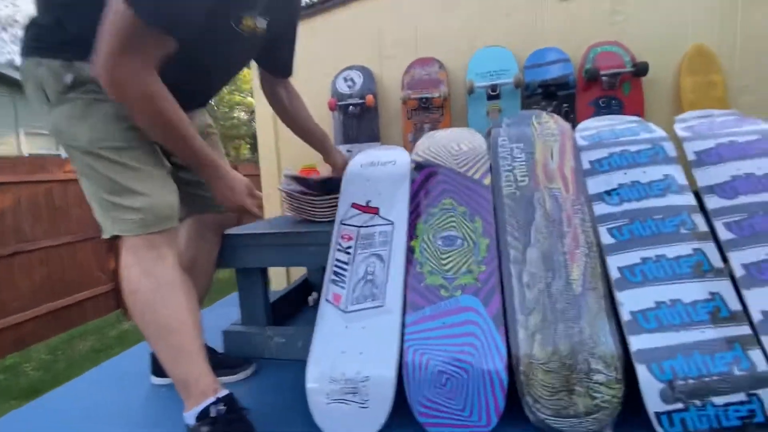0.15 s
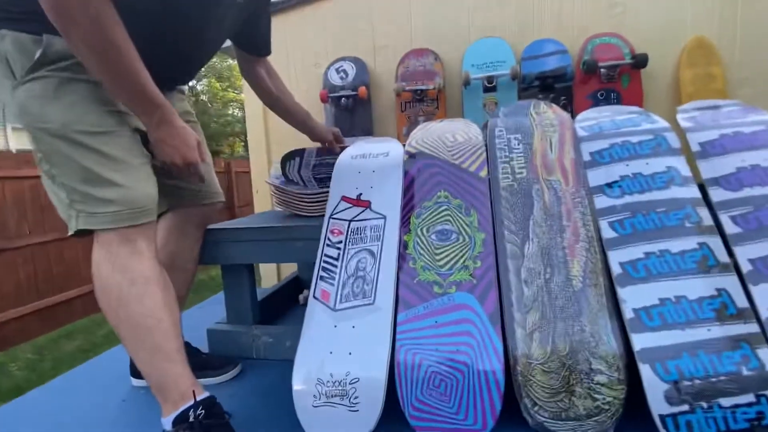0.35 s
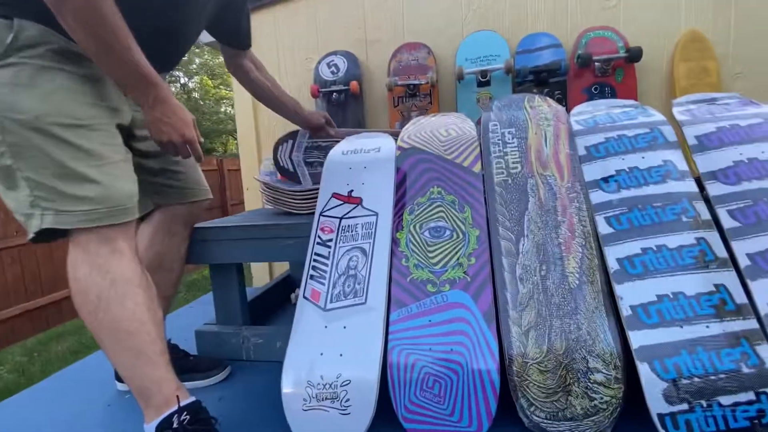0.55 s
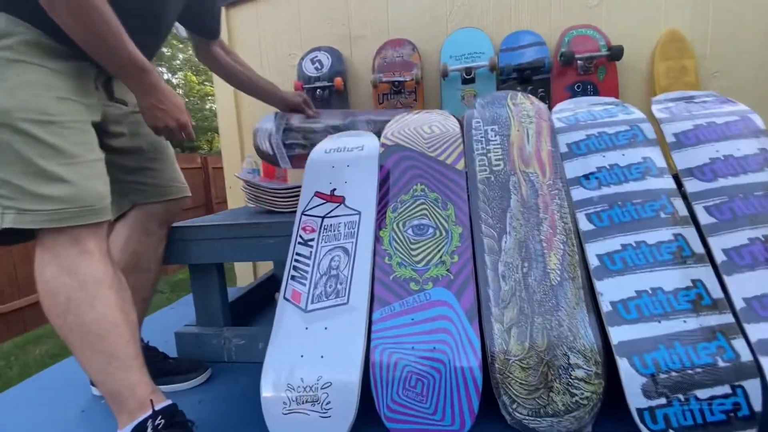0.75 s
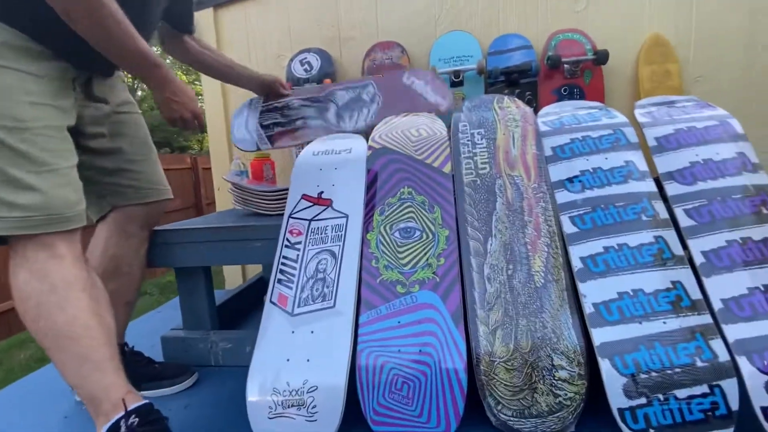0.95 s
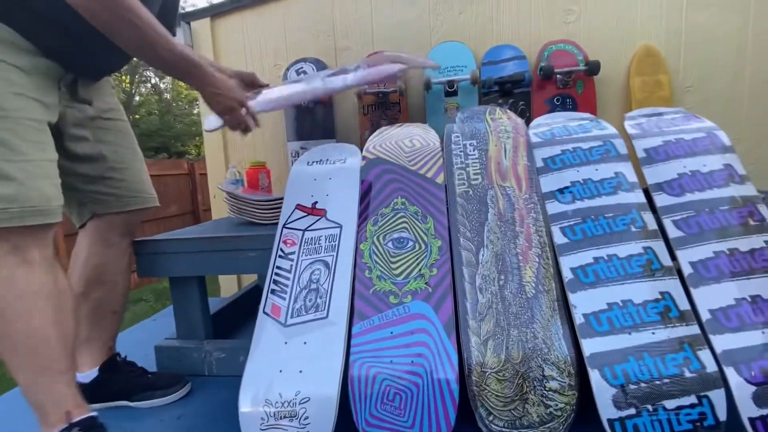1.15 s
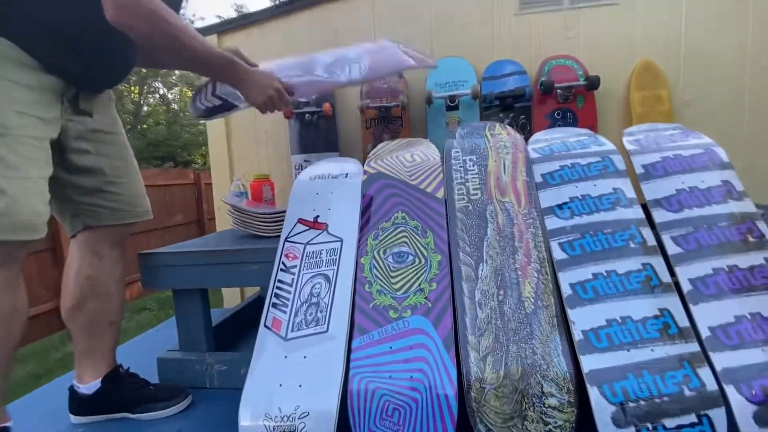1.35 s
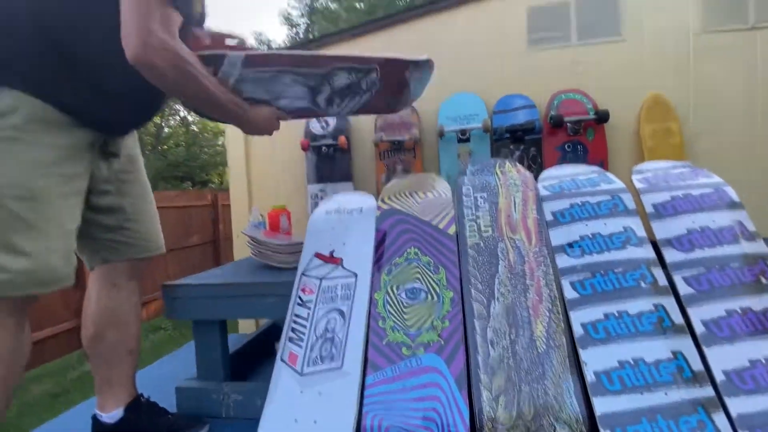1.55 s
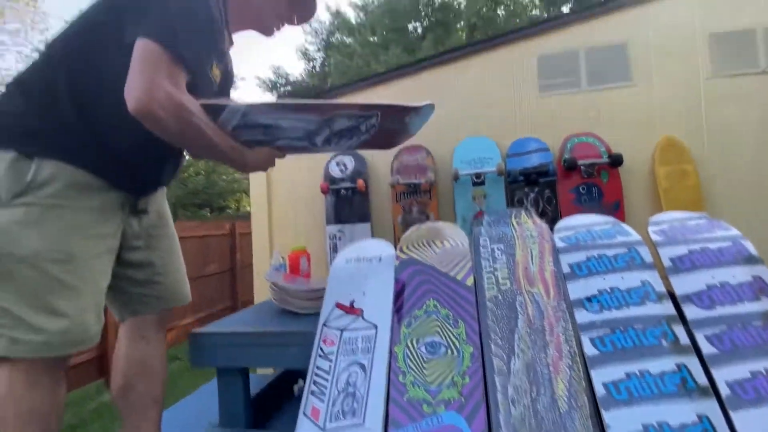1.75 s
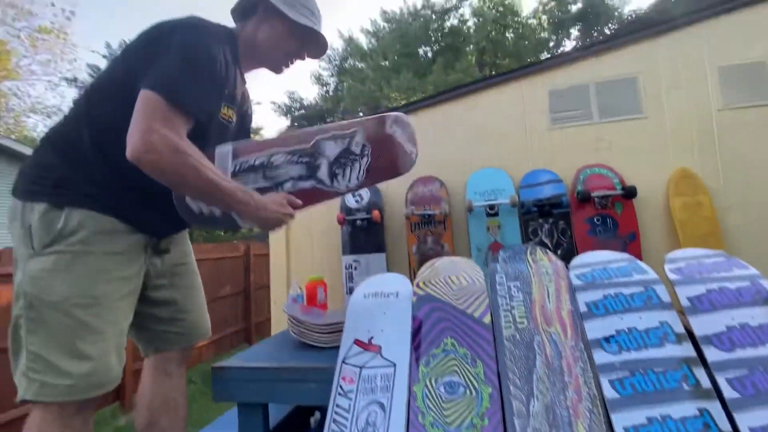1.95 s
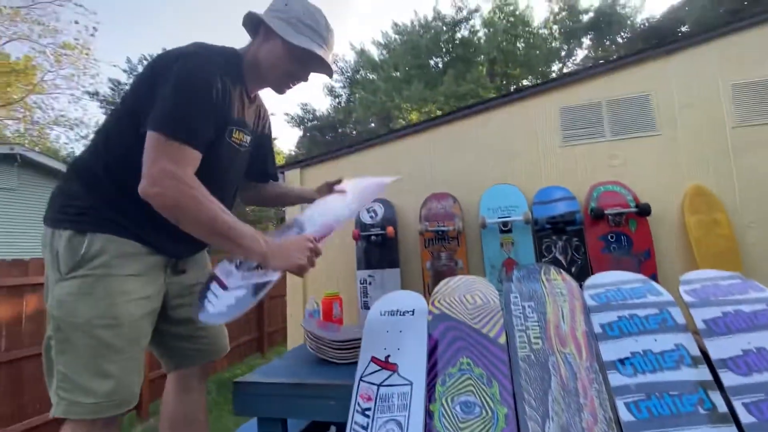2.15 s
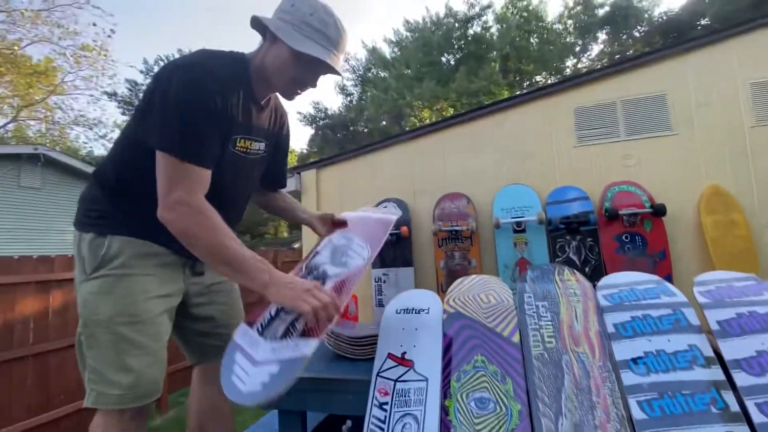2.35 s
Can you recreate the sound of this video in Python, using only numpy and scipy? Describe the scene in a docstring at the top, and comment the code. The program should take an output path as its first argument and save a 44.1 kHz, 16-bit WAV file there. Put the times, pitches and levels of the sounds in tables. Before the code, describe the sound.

Loose wooden board rattles hollowly against stacked boards, then light rubs and taps as birds chirp.

```python
"""A low outdoor rumble and a dry swish of wood come first, then creaks as a wooden skateboard deck is gripped.
The deck is tipped on a stack that lies on a garden bench: it knocks, drops back and rattles as ringing modes
and noise cracks. It is then slid off and turned over in the hands, with noise swishes and light ringing taps.
Small birds call across the yard in gliding tones and noise-modulated buzzes; a wall and a fence answer all
the near sounds with decaying noise echoes. Two microphones with different treble hear the scene."""
import sys
import numpy as np
from scipy import signal
from scipy.fft import rfft, irfft
from scipy.io import wavfile

SR = 44100
rng = np.random.default_rng(int(sys.argv[2]) if len(sys.argv) > 2 else 0)


def store_pcm(level_fs):
    """Save levels as 16-bit WAV."""
    pcm = np.round(np.clip(level_fs, -1, 1) * 32767).astype(np.int16)
    wavfile.write(sys.argv[1], SR, np.atleast_2d(pcm).T)


N = 105840  # samples in the scene

# bending modes of the loose deck: pitch_hz [Hz], level_db [dB], t60_s [s]
DECK_MODES = [(236.8, -4.5, 0.12), (290.7, 2, 0.084), (563, -10.5, 0.14), (880, -30.5, 0.019)]
# modes of the stack of decks: pitch_hz [Hz], level_db [dB]
STACK_MODES = [(238, 5), (404, -10), (499, 0.5), (620, 4.5), (819, -1), (885, -1.5), (935, -4), (968, -0.5),
               (1061, -5), (1189, 0.5), (1470, -7), (1780, -4), (2190, -16), (2400, -6.5), (3080, -9),
               (3700, -10)]

DECK_SIDE, WIDE_HZ = 0.7, 346  # stereo side weight of the wood; pitch of half the full left-right phase shift
WOOD_T60_SLOPE = 0.52  # how steeply ring time shortens with pitch
HELD_T60_S = 0.043  # ring time at 1 kHz of wood damped by the hands


def undb(db):
    """Decibels to gain."""
    return 10 ** (np.asarray(db) / 20)


def unit(x):
    """Scale to rms 1."""
    return x / np.sqrt(np.mean(x ** 2))


def colour(x, points):
    """Filter by a curve of (Hz, dB) points, joined along log frequency."""
    hz, db = np.array(points, float).T
    f = np.maximum(np.fft.rfftfreq(2 * N, 1 / SR), 1)
    gain = undb(np.interp(np.log(f), np.log(hz), db))
    return irfft(rfft(x, 2 * N) * gain)[..., :x.shape[-1]]


def filt(x, hz, kind, order=2):
    """Butterworth filter."""
    edges = np.clip(hz, 10, SR / 2 - 1000)
    return signal.sosfilt(signal.butter(order, edges, kind, fs=SR, output="sos"), x)


def noise(side):
    """Stereo noise with a given side weight."""
    m, s = rng.standard_normal((2, N))
    return (m + side * np.array([s, -s])) / np.sqrt(1 + side ** 2)


def walk(rate):
    """Smooth random wander with rms 1, low-passed at rate in Hz."""
    settled = filt(rng.standard_normal(N + SR), rate, "low")[SR:]
    return unit(settled)


def fade(t60):
    """Exponential decay from time zero, down 60 dB after t60 seconds."""
    return np.exp(-np.log(1000) * np.arange(N) / SR / t60)


def swell(start, length, attack, release):
    """Rounded attack, hold and release; each slope takes at most half the length."""
    t = np.arange(N) / SR - start
    rise = np.clip(t / min(attack, length / 2), 0, 1)
    fall = np.clip((length - t) / min(release, length / 2), 0, 1)
    return np.sin(np.pi / 2 * rise) * np.sin(np.pi / 2 * fall)


def ring(modes):
    """Struck response of a table of modes; higher modes reach the two microphones out of step."""
    t, out = np.arange(N) / SR, 0
    for k, (hz, db, t60) in enumerate(modes):
        sign = (-1) ** k
        spread = np.arctan(DECK_SIDE) * hz ** 2 / (hz ** 2 + WIDE_HZ ** 2)
        lag = sign * spread * np.array([[1], [-1]])
        out = out + sign * undb(db) * np.sin(2 * np.pi * hz * t + lag) * fade(t60)
    return out * (1 - fade(0.012))  # soft onset


def wood_ring(modes, t60):
    """Struck response of wooden modes that last t60 at 1 kHz; higher ones die sooner."""
    return ring([(hz, db, t60 * (1000 / hz) ** WOOD_T60_SLOPE) for hz, db in modes])


def add(out, s, x):
    """Mix x into out from time s."""
    i = int(max(s, 0) * SR)
    out[:, i:] += x[..., :N - i]


def background():
    """Low rumble nearly alike on both sides, wide steady hiss and a distant machine hum that wavers in level."""
    # outdoor air colour: freq_hz [Hz], density_db [dB per Hz]
    air_curve = [(20, -32), (45, -7), (70, 1.5), (95, -8), (120, -3), (170, -13.5), (290, -22),
                 (1000, -34.5), (2500, -40), (5600, -39.5), (7500, -49.5), (15000, -58.5)]
    # distant machine hum: pitch_hz [Hz], level_db [dB]
    hum_tones = [(70, -58.5), (118.4, -58.5), (295.5, -65.5)]
    air_db, wide_hz = -49.5, 510  # air level; the air widens above wide_hz
    t = np.arange(N) / SR
    mid, side = colour(rng.standard_normal((2, N)), air_curve)
    side = 0.087 * side + filt(side, wide_hz, "high", order=1)
    out = undb(air_db) * unit(mid + np.array([side, -side]))
    for hz, db in hum_tones:
        level = undb(db + 2 * walk(3.5)) * np.sqrt(2)
        out = out + level * np.sin(2 * np.pi * (hz * t + rng.random()))
    return out


def rubs():
    """Sliding wood and hands: fine uneven friction hisses while tiny catches of wood on wood ring the board."""
    # swishes: start_s [s], length_s [s], level_db [dB], treble_db above the knee [dB], scrape_db [dB]
    swishes = [(0.009, 0.33, -67.5, 12, 9), (0.083, 0.24, -57.5, -25, -2), (0.944, 0.17, -47.5, 1.5, 0.5),
               (1.251, 0.065, -60, 3, -13), (1.309, 0.17, -51, 3, 2.5), (1.554, 0.15, -62.5, 3, -22),
               (1.613, 0.027, -64, 15.5, -22), (1.798, 0.15, -47, -2.5, -30),
               (1.945, 0.053, -50.5, -0.5, -22), (2.025, 0.28, -60.5, 2, -22),
               (2.27, 0.16, -57.5, -10, -27)]
    # friction colour: freq_hz [Hz], density_db [dB per Hz]
    friction_curve = [(300, -2.5), (620, -1), (1000, 0.5), (2400, -1.5), (4000, -3), (6500, -7.5),
                      (9500, -9.5), (13000, -14), (15500, -35)]
    attack_s, release_s, knee_hz = 0.077, 0.062, 6900
    side, grain_db = 0.89, 1.5  # stereo side weight; spread of the quick unevenness
    board_t60_s, board_share = 0.065, 0.82  # short ringing of the rubbed board
    catches_per_s, catch_spread_db = 900, 3.5

    unevenness = undb(grain_db * walk(410) + 2.15 * walk(30))
    grain = colour(noise(side), friction_curve) * unevenness
    board = unit(rng.standard_normal((1, N)) * fade(board_t60_s)) / np.sqrt(N)
    grain = unit(grain + board_share * signal.fftconvolve(grain, board, axes=1)[:, :N])
    low = filt(grain, knee_hz, "low", order=3)
    high = filt(grain, knee_hz, "high", order=3)

    catches = (rng.random(N) < catches_per_s / SR) * undb(catch_spread_db * rng.exponential(size=N))
    catches = catches * rng.choice([-1, 1], N)
    wood = ring(DECK_MODES) + wood_ring(STACK_MODES, HELD_T60_S)
    scrape = unit(signal.fftconvolve(catches[None], wood, axes=1)[:, :N])

    out = np.zeros((2, N))
    for s, length, db, treble_db, scrape_db in swishes:
        stroke = undb(db) * swell(s, length, attack_s, release_s) ** 1.12
        out += stroke * (low + undb(treble_db) * high + undb(scrape_db) * scrape)
    return out


def creaks():
    """The gripped deck creaks: short resonances roughened by a fast random wander in level."""
    # creaks: start_s [s], level_db [dB]
    grips = [(.112, -43.5), (.125, -42.5), (0.138, -41)]
    # creak resonances: pitch_hz [Hz], level_db [dB], t60_s [s]
    resonances = [(797, -0.5, 0.07), (1340, 3, 0.046), (1484, -1.5, 0.061), (3570, -5, 0.02)]
    out = np.zeros((2, N))
    for s, db in grips:
        add(out, s, undb(db) * ring(resonances) * (1 + .5 * walk(230)))
    return out


def knocks():
    """Each blow bends the deck, rattles the stack (duller when the contact is soft) and shakes the bench below."""
    # blows: start_s [s], flex_db of the deck [dB], clatter_db of the stack [dB],
    # brightness_hz of the contact [Hz], thump_db of the bench [dB]
    blows = [(0.227, -42, -24, 4450, -64), (0.232, -19, -33.5, 900, -61), (0.285, -30, -29.5, 910, -64),
             (0.304, -27.5, -24, 410, -52.5), (0.336, -21.5, -10, 1620, -22.5),
             (.346, -23.5, -15.5, 1290, -12), (.353, -34, -14.5, 1480, -28), (.360, -24, -16.5, 1070, -42),
             (.371, -42, -18.5, 1500, -62), (0.391, -37.5, -20, 2500, -61), (0.4144, -48, -16, 2500, -63),
             (0.421, -21.5, -21.5, 1400, -20.5), (.453, -36, -35.5, 1500, -43),
             (.520, -32, -50, 900, -35.5), (0.563, -23.5, -33, 895, -31), (0.593, -48, -39, 500, -29.5)]
    # bench modes: pitch_hz [Hz], level_db [dB], t60_s [s]
    bench_modes = [(79, 5.5, 0.092), (109.3, -2, 0.27), (134.2, -5.5, 0.2), (177, -7.5, 0.12)]
    # dense crack of the plywood: freq_hz [Hz], density_db [dB per Hz]
    crack_curve = [(150, 5), (400, 9.5), (1100, 2), (2300, -10.5), (3500, -19), (6000, -22), (14000, -31)]
    # faint long ring that outlasts the knocks: pitch_hz [Hz], level_db [dB]
    after_modes = [(1140, -48), (1650, -35)]
    crack_db, crack_t60_s = -0.5, 0.078
    ring_db, stack_t60_s, after_t60_s = -10.5, 0.084, 1  # stack ring time is at 1 kHz

    out, deck, bench = np.zeros((2, N)), ring(DECK_MODES), ring(bench_modes)
    stack = undb(ring_db) * wood_ring(STACK_MODES, stack_t60_s)
    stack = stack + ring([(hz, db, after_t60_s) for hz, db in after_modes])
    crack = undb(crack_db) * unit(colour(noise(DECK_SIDE), crack_curve))
    for s, flex_db, clatter_db, brightness_hz, thump_db in blows:
        fresh_crack = np.roll(crack, rng.integers(N // 2), axis=1)  # another stretch of noise each time
        wood = stack + fresh_crack * fade(crack_t60_s)
        clatter = undb(clatter_db) * filt(wood, brightness_hz, "low", order=1)
        add(out, s, undb(flex_db) * deck + clatter + undb(thump_db) * bench)
    return filt(out, 52, "high", order=4)


def birds():
    """Gliding whistles and thin buzzes (tones times slow noise) that rise and fall, a little to the right."""
    # whistles: start_s [s], length_s [s], start_hz [Hz], end_hz [Hz], level_db [dB]
    whistles = [(0.276, 0.07, 3080, 3030, -58.5), (0.414, 0.078, 2940, 2846, -57.5),
                (0.881, 0.086, 2620, 2460, -67.5), (1.55, 0.045, 2903, 2800, -58.5),
                (1.601, 0.067, 2596, 2530, -62.5), (2.185, 0.082, 3240, 3150, -64),
                (2.281, 0.12, 2730, 2950, -60)]
    # buzzy calls: start_s [s], length_s [s], pitch_hz at both ends [Hz], level_db [dB]
    buzzes = [(0.458, 0.02, 5380, -52), (0.494, 0.033, 5210, -56.5), (0.52, 0.23, 5400, -67.5),
              (0.527, 0.13, 7580, -66), (0.82, 0.17, 5280, -66), (1.10, 0.24, 5370, -62.5),
              (1.651, 0.16, 5240, -61), (2.268, 0.24, 5300, -60.5)]
    wobble_share, arch_share = 0.00676, 0.038  # whistle wobble and mid-buzz rise, as shares of the pitch
    buzz_width_hz, pan_db = 360, -3.5  # pan is left minus right
    t, out = np.arange(N) / SR, np.zeros((2, N))
    wobble, flutter = 1 + wobble_share * walk(180), undb(2 * walk(39.7))
    for s, length, start_hz, end_hz, db in whistles:
        pitch = np.interp(t, [s, s + length], [start_hz, end_hz]) * wobble
        level = undb(db) * swell(s, length, 0.0196, 0.0048) * flutter
        out += level * np.sin(2 * np.pi * np.cumsum(pitch) / SR)
    rasp = unit(filt(noise(.8), buzz_width_hz / 2, "low", order=3))
    for s, length, hz, db in buzzes:
        pitch = hz * (1 + arch_share * swell(s, length, length, length))
        level = undb(db) * swell(s, length, 0.018, 0.083) * rasp
        out += level * np.sin(2 * np.pi * np.cumsum(pitch) / SR)
    return out * undb(np.array([[pan_db], [-pan_db]]) / 2)


def taps():
    """Light taps of hands and ticks of the edge: a noise scuff and the held deck's modes in a band, plus deck flex."""
    # contacts: start_s [s], level_db [dB], centre_hz [Hz]
    contacts = [(1.083, -36, 10600), (1.33, -49, 2500), (1.5035, -28.5, 2420), (1.583, -40, 1920),
                (1.856, -34.5, 900), (2.111, -37, 1580), (2.267, -41, 5350)]
    # modes of the deck held in the hands: pitch_hz [Hz], level_db [dB]
    held_modes = [(825, 1), (1020, -2.5), (1352, 1.5), (1510, -9), (1780, 0.5), (1960, 1.5), (3058, -1),
                  (3680, -2)]
    scuff_t60_s, scuff_db, held_db, flex_db = 0.035, -7.5, -7, -16
    width = 0.53  # half width of the band, as a share of its centre
    out, held = np.zeros((2, N)), wood_ring(held_modes, HELD_T60_S)
    deck = undb(flex_db) * ring(DECK_MODES)
    for s, db, hz in contacts:
        band = [hz / (1 + width), hz * (1 + width)]
        scuff = undb(scuff_db) * unit(filt(noise(0.57), band, "band")) * fade(scuff_t60_s)
        add(out, s, undb(db) * (scuff + undb(held_db) * filt(held, band, "band") + deck))
    return out


def yard(x):
    """Scattered echoes from wall and fence as decaying noise; the lows last slightly longer."""
    echo_db, delay_s, low_t60_s, high_t60_s = -17.5, .012, 0.4, 0.39
    lows = filt(noise(0.1), 373, "low") * fade(low_t60_s)
    highs = filt(noise(0.4), 500, "high") * fade(high_t60_s)
    echo = np.zeros((2, N))
    add(echo, delay_s, filt(lows + highs, 4850, "low", order=1))
    echo = unit(echo) / np.sqrt(N)
    return x + undb(echo_db) * signal.fftconvolve(x, echo, axes=1)[:, :N]


def scene():
    """The handled deck and the birds, with echoes from the yard, over the background."""
    return background() + yard(rubs() + creaks() + knocks() + birds() + taps())


def record(dry):
    """Two microphones that differ in the treble, and a steep top cut."""
    # microphone mismatch: freq_hz [Hz], left minus right level_db [dB]
    mismatch = [(1500, 0), (5600, -3), (7500, 0), (9800, 10), (12500, -1)]
    top_hz = 15300
    heard = []
    for x, sign in zip(dry, (1, -1)):
        heard.append(colour(x, [(hz, sign * db / 2) for hz, db in mismatch]))
    top_cut = signal.ellip(8, .2, 70, top_hz, fs=SR, output="sos")
    return signal.sosfilt(top_cut, np.array(heard))


dry = scene()
out = record(dry)
store_pcm(out)
```